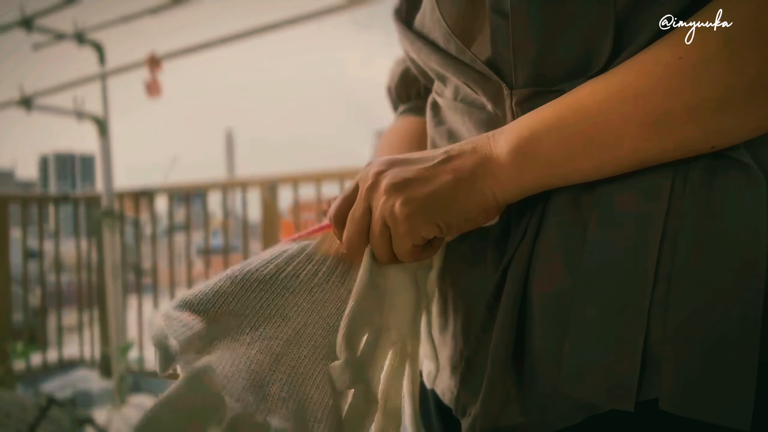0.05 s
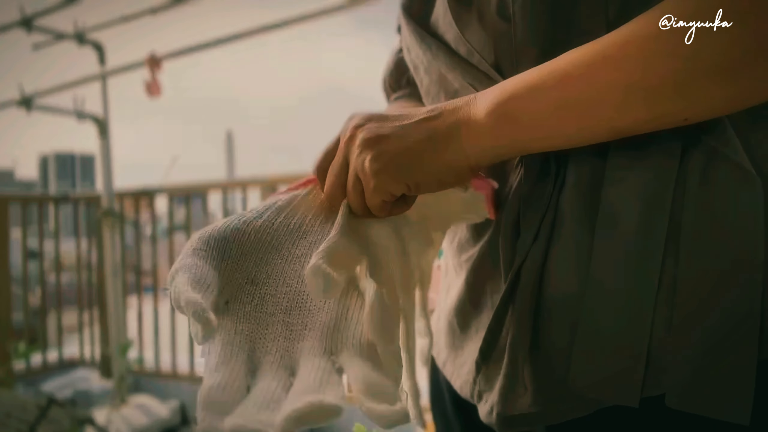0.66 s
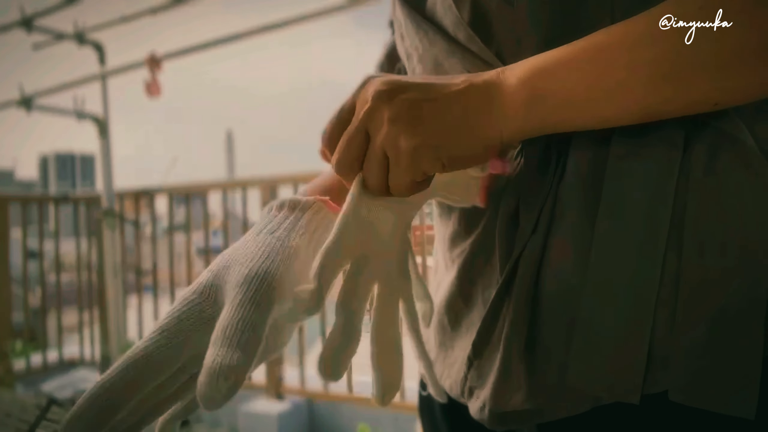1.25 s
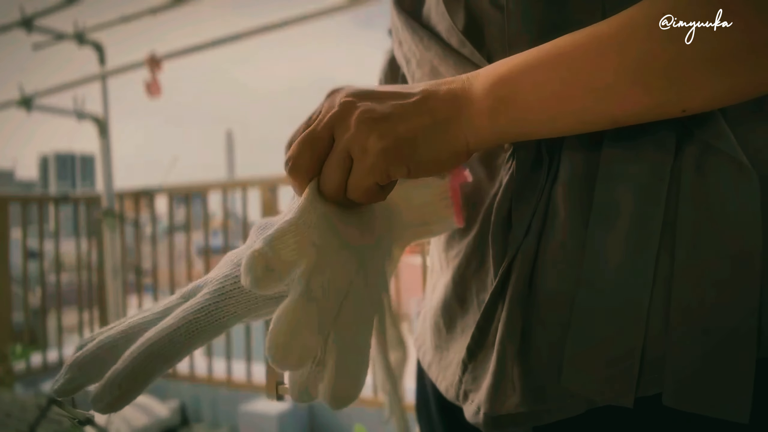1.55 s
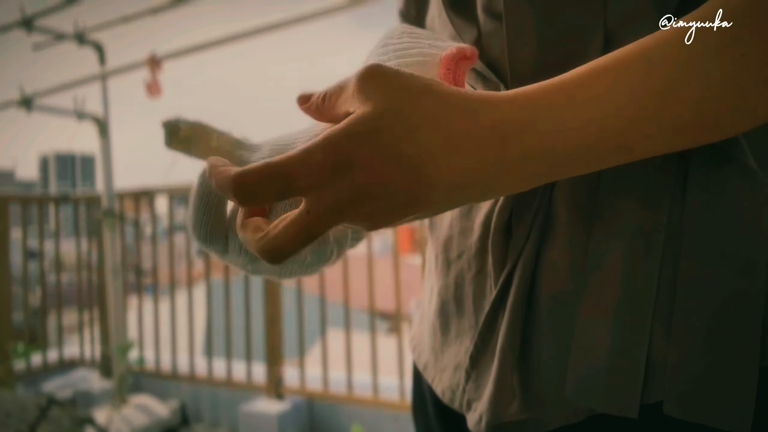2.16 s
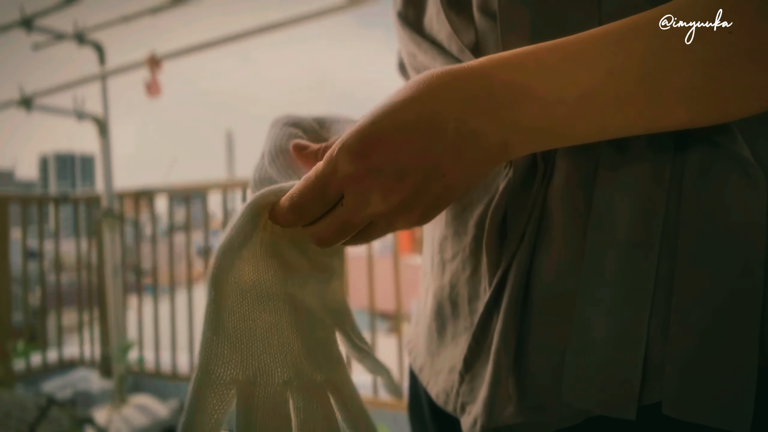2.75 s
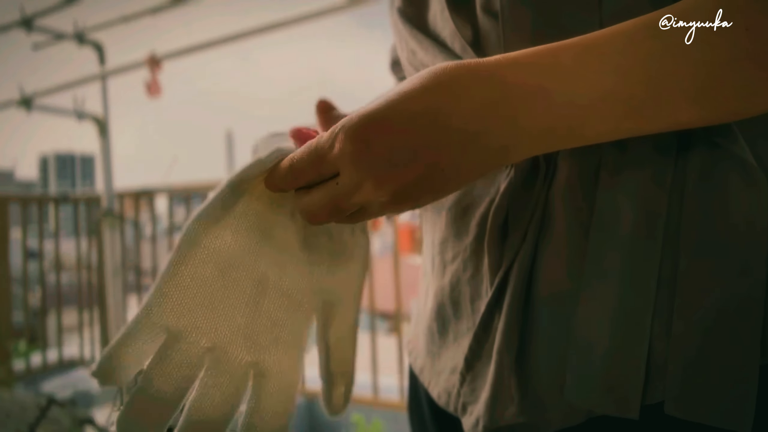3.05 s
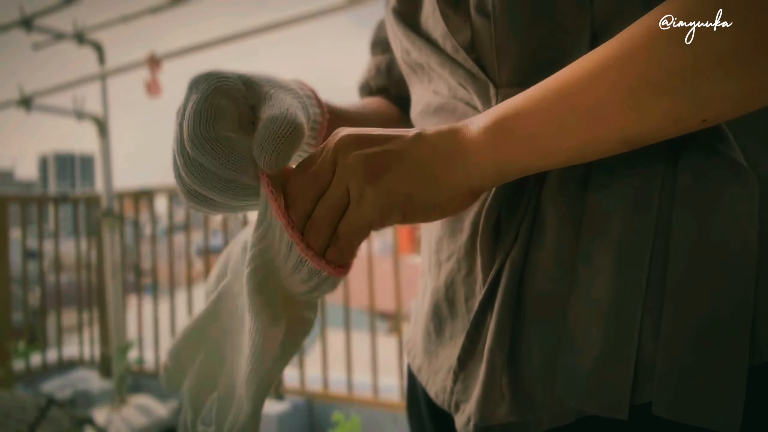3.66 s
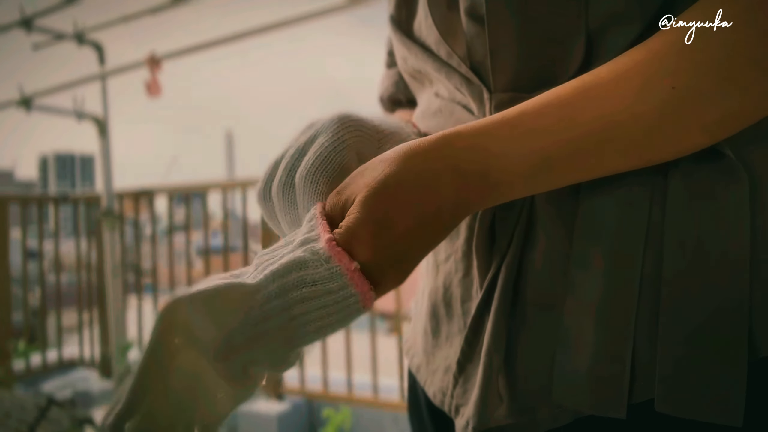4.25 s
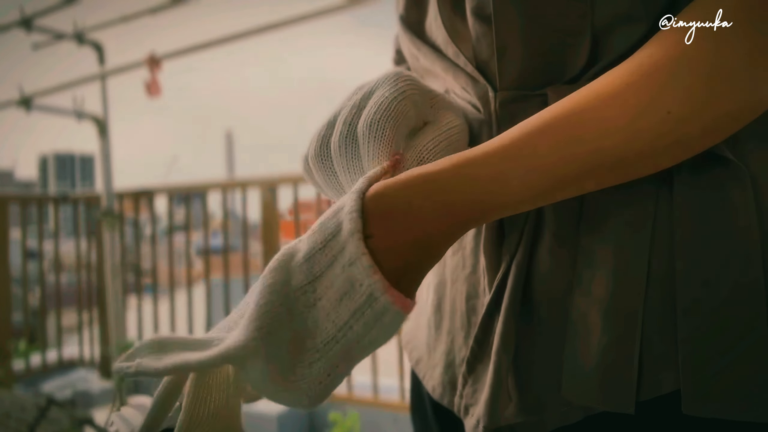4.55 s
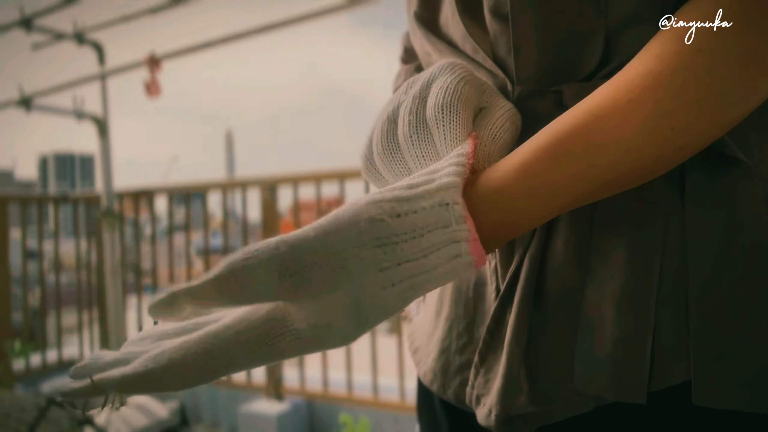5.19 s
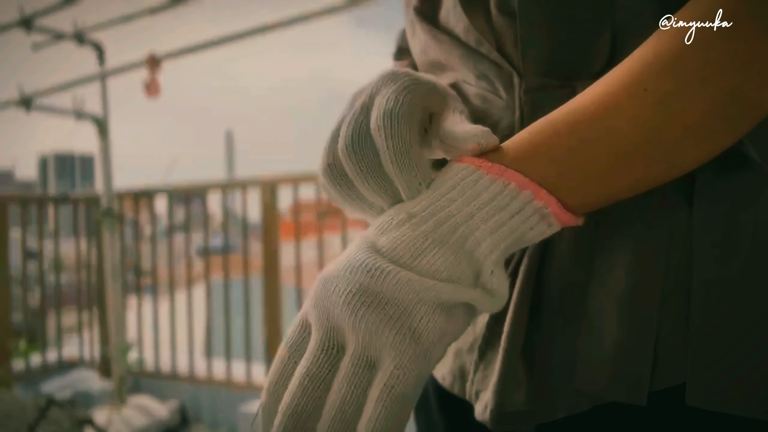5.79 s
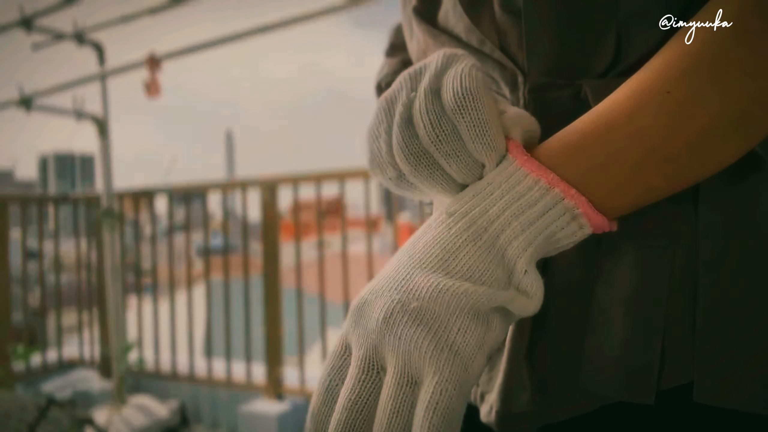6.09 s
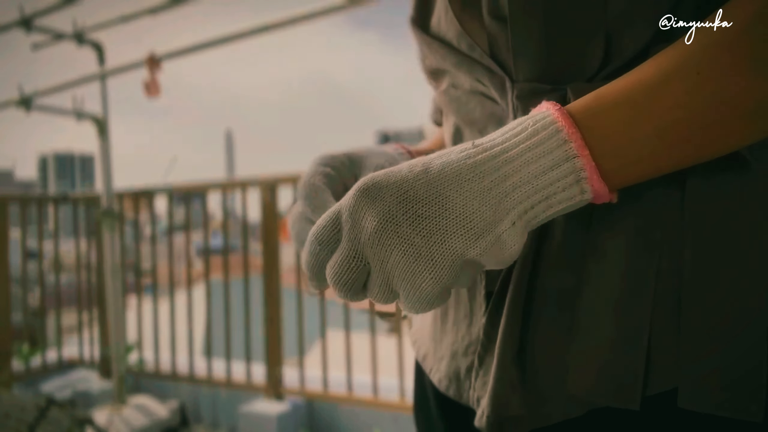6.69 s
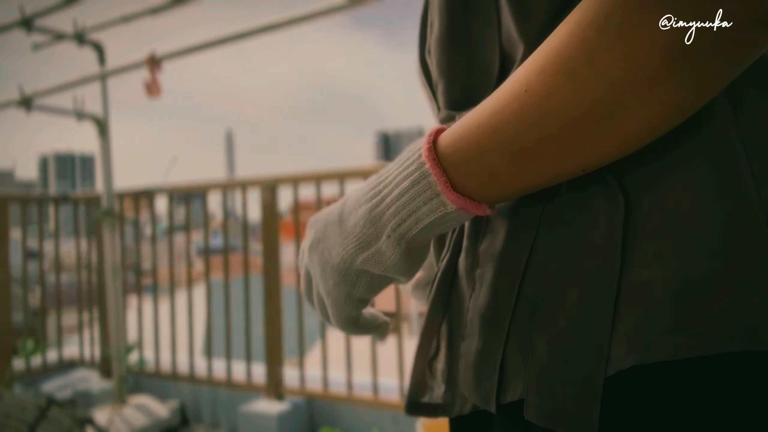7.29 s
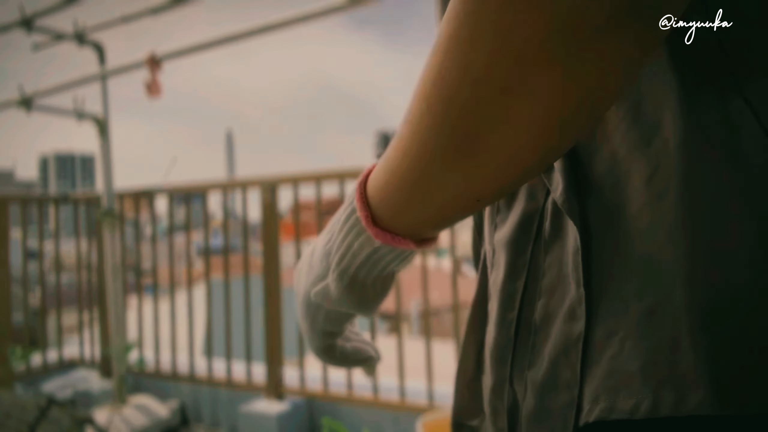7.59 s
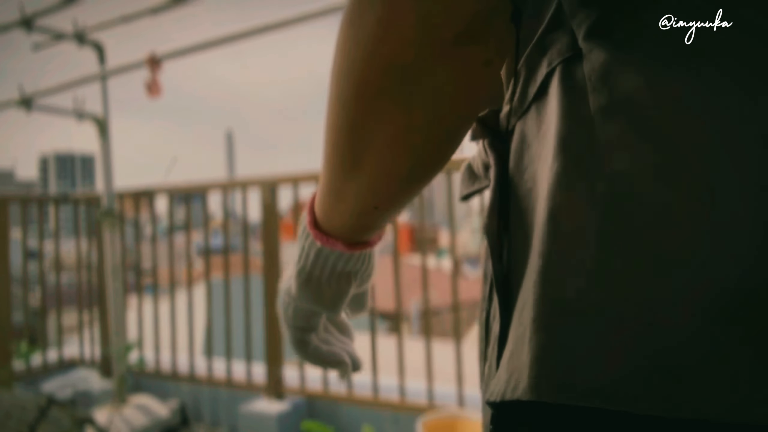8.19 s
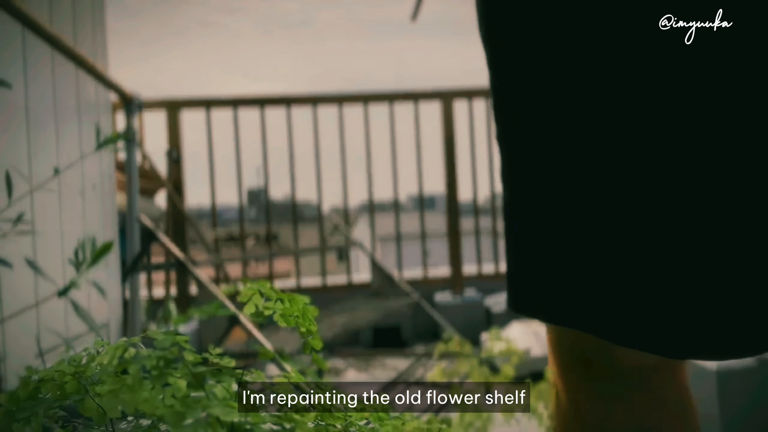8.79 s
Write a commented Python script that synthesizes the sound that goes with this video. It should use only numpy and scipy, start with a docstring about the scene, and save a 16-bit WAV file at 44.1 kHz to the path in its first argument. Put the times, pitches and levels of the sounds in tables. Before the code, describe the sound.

Small birds chirp and whistle in quick, short notes at several distances, over the constant low roar of far traffic and a wavering motor hum. Near the stereo microphone, someone on a roof balcony tugs on knitted gloves, the yarn faintly rubbing and giving a cluster of tiny snaps. From halfway, deep gusts of air hit the microphone, peaking with a dull thump. A couple of light knocks come near the end.

```python
"""A roof balcony in a city. Far traffic roars (dark noise) and a motor hums (a few low, wavering tones).
Close by, someone pulls on a knitted work glove: the yarn rustles and snaps (bright noise and clicks).
A sparrow repeats a buzzy chirp and other small birds whistle (gliding tones that echo off the houses).
From about halfway, puffs of air buffet the stereo microphone (swells of deep noise), and near the end
come a few soft bumps (low tones that die quickly)."""
import sys
import numpy as np
from scipy import signal
from scipy.fft import rfft, irfft
from scipy.io import wavfile
from scipy.ndimage import uniform_filter1d

SR = 44100
rng = np.random.default_rng(int(sys.argv[2]) if len(sys.argv) > 2 else 0)


def to_wav(s):
    """Save 16-bit WAV."""
    ch = np.atleast_2d(s).T  # columns
    pcm = np.round(np.clip(ch, -1, 1) * 32767)  # PCM
    wavfile.write(sys.argv[1], SR, pcm.astype(np.int16))


N = 389844
TIME = np.arange(N) / SR


def undb(db):
    """Turn decibels into a number to multiply by."""
    return 10 ** (np.asarray(db) / 20)


def unit(x):
    """Scale a signal to an average strength (rms) of one."""
    return x / np.sqrt(np.mean(x ** 2) + 1e-24)


def curves(table):
    """Join rows of (time_s, values...) into one curve over time for each value."""
    times, *columns = np.transpose(table)
    return [np.interp(TIME, times, column) for column in columns]


def across_spectrum(points):
    """Join (frequency_hz, value) points into a curve over all frequencies."""
    hz, value = np.transpose(points)
    return np.interp(np.log(np.fft.rfftfreq(N, 1 / SR) + 1), np.log(hz), value)


def colour(x, points):
    """Turn parts of a sound up or down by (frequency_hz, gain_db) points."""
    return irfft(rfft(x) * undb(across_spectrum(points)), N)


def wobble(per_s, size=N):
    """A smooth random curve, about one in size, with per_s new values a second."""
    hold = max(int(SR / per_s), 1)
    steps = np.repeat(rng.standard_normal(size // hold + 2), hold)
    return unit(uniform_filter1d(uniform_filter1d(steps, hold), hold))[:size]


def add(track, start_s, sound):
    """Mix a sound into a track."""
    i = max(int(start_s * SR), 0)
    track[i:i + len(sound)] += sound[:max(N - i, 0)]


def play(events):
    """Make a track from (start_s, sound) pairs."""
    track = np.zeros(N)
    for start_s, sound in events:
        add(track, start_s, sound)
    return track


def swells(table, power, crest=0.47):
    """A rise and fall for each (start_s, length_s, level_db); more power makes it more pointed."""
    def swell(length_s):
        progress = np.linspace(0, 1, int(length_s * SR))
        return np.abs(np.sin(np.interp(progress, [0, crest, 1], [0, np.pi / 2, np.pi]))) ** power
    return play((s, undb(db) * swell(length_s)) for s, length_s, db in table)


def note(arc_hz, length_s, db, waver=0.0097, flutter_db=2.0):
    """A bird's whistle: a nearly pure tone gliding through a start, middle and end pitch."""
    size = int(length_s * SR)
    arc = np.polyval(np.polyfit([0, .5, 1], arc_hz, 2), np.linspace(0, 1, size))
    hz = arc * (1 + waver * wobble(288, SR // 4)[:size])
    loudness = np.sqrt(2) * undb(db + flutter_db * wobble(124, SR // 4)[:size])
    return loudness * signal.windows.tukey(size, .35) * np.sin(2 * np.pi * np.cumsum(hz) / SR)


# the tone of the traffic: frequency_hz, gain_db
TRAFFIC_COLOUR = [(12, -0.5), (28, -16.5), (42, 3), (65, 3), (110, -4), (200, -8.5), (350, -16.5),
                  (750, -15.5), (1100, -21), (1600, -32), (3000, -43), (6000, -55), (13000, -59.5),
                  (16000, -65)]
# its slow swell: time_s, level_db (before gain_db)
TRAFFIC_SWELL = [(0, -54.5), (1.6, -54), (2.6, -54.5), (4, -54), (6, -54.5), (7.5, -53.5), (8.3, -54.5),
                 (8.84, -55)]
# its extra rumble: time_s, bass_gain_db
TRAFFIC_BASS = [(0, 0.5), (2, 0), (4, .7), (6.5, 1.5), (7.3, -0.5), (7.6, -0.5), (8.84, 0.5)]
# how alike left and right are: frequency_hz, likeness (0 to 1)
TRAFFIC_LIKENESS = [(40, 0.65), (150, 0.99), (500, 0.43), (1000, 0.41), (2500, 0.45), (12000, 0.67)]
# which side is louder: frequency_hz, left_minus_right_db
TRAFFIC_BALANCE = [(60, 0), (200, -2), (700, -3), (1300, -1), (8000, -0.5)]


def traffic(gain_db=9, flicker_db=0.5, bass_hz=150):
    """Far traffic blends into a wide, dark roar that swells slowly."""
    db, = curves(TRAFFIC_SWELL)
    bass_db, = curves(TRAFFIC_BASS)
    alike = across_spectrum(TRAFFIC_LIKENESS)
    lean = undb(across_spectrum(TRAFFIC_BALANCE) / 2)
    # mid is what both ears share, side is what sets them apart
    mid, side = rfft(rng.standard_normal((2, N)))
    mid, side = mid * np.sqrt(1 + alike), side * np.sqrt(1 - alike)
    noise = irfft([(mid + side) * lean, (mid - side) / lean], N)
    roar = unit(colour(noise, TRAFFIC_COLOUR))
    bass = colour(roar, [(bass_hz, 0), (2 * bass_hz, -20)])
    return (roar + (undb(bass_db) - 1) * bass) * undb(db + gain_db + flicker_db * wobble(9))


# how the hum drifts: time_s, pitch_hz, level_db (before gain_db)
HUM_DRIFT = [(0, 52.2, -59), (.55, 49.56, -54), (.8, 47.08, -53), (2, 46.22, -44), (3.3, 46.77, -43.5),
             (4.5, 46.5, -48), (7.1, 46.53, -41.5), (7.5, 46.9, -60), (8.84, 47.2, -69)]
# the tones in the hum: pitch_multiple, gain_db
HUM_TONES = [(1, -3), (2, -10), (3, -22.5), (5, -22)]


def motor(gain_db=-1.5, pan_db=-3.0, lag_radians=0.4):
    """A motor below hums on a few wavering tones; walls put left and right a little out of step."""
    hz, db = curves(HUM_DRIFT)
    phase = 2 * np.pi * np.cumsum(hz * (1 + .02 * wobble(6))) / SR
    sides = np.array([[.5], [-.5]])
    hum = np.zeros((2, N))
    for multiple, tone_db in HUM_TONES:
        strength = undb(tone_db + 3.0 * wobble(6))
        hum += strength * np.sin(multiple * phase + lag_radians * sides * wobble(3.18))
    return np.sqrt(2) * hum * undb(db + gain_db + pan_db * sides)


# the distant flock: time_s, level_db (before gain_db)
TWITTER_SWELL = [(0, -74.5), (1.5, -73), (2.3, -75), (2.7, -81.5), (3.2, -76.5), (3.9, -74), (5.2, -78),
                 (6.7, -81.5), (8.2, -72), (8.4, -82), (8.84, -71)]


def twitter(count=300, scatter_db=1.0, gain_db=-7):
    """Many faint birds whistle short glides at random moments and pitches, most of them falling."""
    db, = curves(TWITTER_SWELL)
    flock = np.zeros(N)
    for k, (when, length, pitch, bend, glide, strength) in enumerate(rng.random((count, 6))):
        hz, sweep_hz = 2100 + 2600 * pitch, 1700 * (glide - .7)
        arc_hz = [hz - sweep_hz, hz + 400 * bend, hz + sweep_hz]
        note_db = scatter_db * (2 * strength - 1)
        whistle = note(arc_hz, .02 + .04 * length, note_db, waver=0.021, flutter_db=1)
        add(flock, (k + when) / count * N / SR, whistle)
    return flock * undb(db + gain_db)


def stitch_catches(per_s=45, gain_db=2.5, decay_s=0.0038):
    """Stitches catch and let go at random, making brief jumps in the strength of the rubbing."""
    jolts = (rng.random(N) < per_s / SR) * rng.random(N)
    return undb(gain_db) * signal.lfilter([1], [1, -np.exp(-1 / (decay_s * SR))], jolts)


# pulls of the glove over the hand: start_s, length_s, level_db (before rub_db)
GLOVE_PULLS = [(.02, .14, -78), (.17, .24, -78.5), (.39, 0.085, -73.5), (.64, 0.14, -72.5),
               (.8, 0.1, -70.5), (.93, .12, -68), (1.19, 0.092, -77), (1.58, 0.15, -71.5),
               (1.82, 0.05, -79), (3.18, 0.13, -75.5), (3.58, 0.075, -75), (3.67, .14, -72.5),
               (3.8, 0.084, -71.5), (4.21, 0.22, -66), (4.38, .35, -67.5), (4.77, 0.37, -74),
               (5.1, 0.35, -69), (5.55, .07, -74), (5.77, .07, -76), (6.11, 0.14, -73), (6.6, .5, -80),
               (7.2, 0.21, -81.5), (7.52, 0.33, -78.5), (8.6, 0.57, -75)]
# the tone of rubbing yarn: frequency_hz, gain_db
YARN_COLOUR = [(700, -26), (2000, 8.5), (4000, 0), (6500, 3.5), (9000, 1.5), (12500, 2), (14500, 0),
               (16000, -13)]
# snapping threads: start_s, peak_db, centre_hz, width_hz, decay_s
YARN_SNAPS = [(3.245, -49, 10000, 6000, .001), (3.834, -37, 9500, 6940, .0012),
              (4.269, -36.5, 2180, 1800, 0.003), (4.2793, -34, 11400, 6000, 0.0011),
              (4.294, -45, 11000, 7000, .0006), (4.345, -31.5, 10800, 3500, 0.00086),
              (4.437, -41, 9500, 8000, .002), (4.5142, -33, 10800, 2800, .0005),
              (6.18, -49, 9000, 7950, .0011)]
# the phase shift of the right side against the left: frequency_hz, shift_radians
RIGHT_PHASE_SHIFT = [(100, 0), (5000, -.3), (6800, -2.7), (7500, -2.5), (9100, -.9), (12200, .5),
                     (13400, 1.6), (14600, 2.9)]


def glove(rub_db=2, grain_db=3.0, spread=0.72):
    """Countless fibres slip over the skin and a few threads snap."""
    pull = swells(GLOVE_PULLS, power=0.72)
    slips = rng.standard_normal((3, N)) * undb(grain_db * rng.exponential(size=(3, N)))
    rustle = unit(colour(slips, YARN_COLOUR)) * pull * (1 + stitch_catches())
    direct, *scattered = rustle * undb(rub_db + 0.76 * wobble(150))
    t = np.arange(SR // 50) / SR
    for start_s, peak_db, hz, width_hz, decay_s in YARN_SNAPS:
        snap = band(rng.standard_normal(len(t)) * np.exp(-t / decay_s), hz, width_hz)
        add(direct, start_s, undb(peak_db) * snap / np.abs(snap).max())
    # the treble's phase shifts between left and right, widening the rustle
    right = irfft(rfft(direct) * np.exp(-1j * across_spectrum(RIGHT_PHASE_SHIFT)), N)
    return np.array([direct, right]) + spread * np.array(scattered)


def band(x, hz, width_hz):
    """Keep the part of a sound near one frequency."""
    return signal.lfilter(*signal.iirpeak(hz, hz / width_hz, fs=SR), x)


# opening peeps, each a flick over a falling note: start_s, level_db
FAR_PEEPS = [(.149, -64), (.331, -63), (.518, -64.5)]
# slow whistles that go up and down: start_s, level_db
FAR_ARCHES = [(1.404, -71), (1.9, -72), (2.42, -69), (2.98, -71), (3.13, -71), (3.51, -68.5)]
# falling notes between them: start_s, level_db
FAR_FALLS = [(1.04, -68), (1.67, -66), (1.8, -69), (2.164, -68), (2.616, -67), (3.096, -68.5), (3.5, -73),
             (3.956, -68.5), (4.03, -68), (4.414, -72), (4.5, -64.5)]
# a short high note, then a lower one: start_s, low_length_s, low_pitch_hz, level_db (before the mix)
FAR_TWO_STEPS = [(4.82, 0.048, 2105, -69), (5.16, 0.042, 2096, -70), (5.2, .08, 2295, -69.5),
                 (5.485, 0.057, 2110, -69), (5.72, .11, 2300, -69), (5.84, 0.042, 2100, -69),
                 (6.255, 0.045, 2115, -66.5), (6.61, 0.065, 2130, -68.5), (6.811, 0.079, 2302, -70.5),
                 (7.005, 0.092, 2153, -72.5)]
# the lower note's bend, in multiples of its pitch: start, middle, end
LOW_BEND = [1.04, 1, 1.005]


def far_bird(peep_hz=(2170, 2540, 2130), arch_hz=(1960, 2300, 1690), fall_hz=(2261, 2027, 1950),
             high_hz=(2763, 2590, 2380), peep_s=0.019, arch_s=.125, fall_s=0.0547, high_s=.036):
    """A lower voice whistles further off. Gives the direct sound and the sound that will echo."""
    peeps = play((s, note(peep_hz, peep_s, db)) for s, db in FAR_PEEPS)
    peeps += play((s + 0.0091, note(fall_hz, fall_s, db - 4)) for s, db in FAR_PEEPS)
    arches = play((s, note(arch_hz, arch_s, db, waver=0.0089, flutter_db=2.5)) for s, db in FAR_ARCHES)
    falls = play((s, note(fall_hz, fall_s, db, waver=0.019)) for s, db in FAR_FALLS)
    steps = play((s, note(high_hz, high_s, db - 2.5, waver=0.019)) for s, _, _, db in FAR_TWO_STEPS)
    steps += play((s + high_s, note(hz * np.array(LOW_BEND), length_s, db, waver=.016))
                  for s, length_s, hz, db in FAR_TWO_STEPS)
    # the arches carry straight across; the two-step calls arrive mostly as echo
    direct = peeps + arches + falls + undb(-0.5) * steps
    outgoing = peeps + falls + undb(-4) * arches + undb(5) * steps
    return direct, outgoing


# rising whistles: start_s, length_s, level_db
SONG_RISES = [(0.724, 0.12, -70), (0.956, 0.13, -68.5), (1.28, 0.096, -66.5), (1.507, .1, -65.5),
              (7.021, .11, -68), (7.273, .085, -67.5)]
# the glide they share: start_hz, middle_hz, end_hz
RISE_ARC_HZ = [2640, 3090, 3214]
# quick downward slides: start_s, length_s, pitch_hz, level_db
SONG_SLIDES = [(.215, 0.079, 4690, -71), (0.589, 0.026, 4670, -71.5), (.89, 0.05, 3900, -73),
               (1.684, 0.032, 4200, -67.5), (1.758, 0.034, 3580, -67), (1.917, 0.021, 3830, -68),
               (1.946, .02, 4050, -72), (2.068, 0.024, 4800, -68.5), (2.328, 0.06, 3850, -68.5),
               (5.921, 0.081, 4930, -73), (6.027, 0.033, 4800, -69.5), (6.356, 0.036, 5100, -75),
               (6.488, .03, 5170, -72), (6.56, .035, 4580, -68.5), (7.111, 0.039, 4360, -63.5),
               (7.167, .07, 5420, -74), (7.421, 0.039, 4440, -71), (7.658, 0.035, 4020, -67.5),
               (7.803, 0.033, 4860, -71.5), (7.958, .056, 3500, -72), (8.09, 0.041, 3480, -73)]
# a slide's bend, in multiples of its pitch: start, middle, end
SLIDE_BEND = [1, .89, .73]
# short upturned notes: start_s, pitch_hz, level_db
SONG_LILTS = [(.415, 5580, -76), (.58, 2930, -71), (1.39, 3560, -66), (1.78, 2600, -66), (1.966, 3480, -67),
              (2.112, 3710, -65.5), (5.77, 5060, -76), (6.815, 3140, -68.5), (7.04, 5080, -75.5),
              (7.085, 3576, -62.5), (7.46, 3420, -68.5), (7.708, 3530, -71), (7.845, 3690, -70),
              (7.947, 5070, -77), (8.175, 4270, -73)]


def songbird(lilt_bend=(0.92, 1, 1.025), lilt_s=0.0377):
    """A bird warbles three kinds of note: rising whistles, downward slides and short upturned lilts."""
    rises = play((s, note(RISE_ARC_HZ, length_s, db)) for s, length_s, db in SONG_RISES)
    slides = play((s, note(hz * np.array(SLIDE_BEND), length_s, db, waver=0.02, flutter_db=1.0))
                  for s, length_s, hz, db in SONG_SLIDES)
    lilts = play((s, note(hz * np.array(lilt_bend), lilt_s, db, waver=0.014))
                 for s, hz, db in SONG_LILTS)
    return rises + slides + lilts


# buzzy chirps: start_s, length_s, end_pitch_hz, drop_hz, warble_hz, level_db (before swell and rasp)
SPARROW_CHIRPS = [(0.736, 0.17, 3870, 322, 636, -58.5), (1.476, 0.16, 4066, 171.4, 540, -56.5),
                  (2.186, 0.14, 3980, 425, 590, -59.5), (2.85, .21, 3924, 311, 764, -58.5),
                  (3.595, .19, 3970, 385, 564, -60.5), (4.265, 0.14, 4130, 211.5, 557, -56.5),
                  (4.931, .19, 4070, 380, 598, -60), (5.479, .21, 4763, 220, 497, -63.5),
                  (5.99, .21, 4750, 60, 440, -63.5), (6.522, 0.23, 4950, 122, 475, -64)]
# faint up-and-down chips that lead into some chirps: start_s, level_db
SPARROW_CHIPS = [(1.385, -80), (2.105, -70), (2.763, -70.5), (3.497, -75), (4.168, -66), (4.84, -73)]


def sparrow(first_buzz_hz=85, buzz_hz=135, overtone_db=-30, chip_hz=(4000, 5130, 4320), chip_s=.053):
    """Each chirp sinks in pitch while quick upward flicks speed up and shrink to a trembling whistle."""
    chirps = np.zeros(N)
    for start_s, length_s, end_hz, drop_hz, warble_hz, db in SPARROW_CHIRPS:
        size = int(length_s * SR)
        progress = np.linspace(0, 1, size)
        flick_hz = np.interp(progress, [0, .35], [first_buzz_hz, buzz_hz]) * (1 + .15 * wobble(60, size))
        depth = np.interp(progress, [0, .2, .5, 1], [1, .85, .25, .08])
        flick = depth * np.sin(np.pi * np.cumsum(flick_hz) / SR) ** 4
        sinking_hz = end_hz + drop_hz * (1 - progress) ** 1.1
        hz = sinking_hz + warble_hz * (flick - .05) + 30 * wobble(300, size)
        phase = 2 * np.pi * np.cumsum(hz) / SR
        swell_db = np.interp(progress, [0, 0.18, 1], [-8, 2, -8])
        # the voice thins at the top of each flick and trembles
        rasp_db = -9 * flick + 2.5 * wobble(110, size)
        loudness = undb(db + swell_db + rasp_db) * signal.windows.tukey(size, .12)
        add(chirps, start_s, loudness * (np.sin(phase) + undb(overtone_db) * np.sin(2 * phase)))
    return np.sqrt(2) * chirps + play((s, note(chip_hz, chip_s, db)) for s, db in SPARROW_CHIPS)


# clear pips: start_s, pitch_hz, level_db
NEAR_PIPS = [(1.12, 2670, -58), (2.52, 2640, -57.5), (3.195, 2686, -57.5), (3.933, 2570, -63),
             (4.583, 2630, -61.5)]


def near_bird(bend=(1.025, 0.99, 1), pip_s=0.042):
    """A nearer bird whistles short pips that hardly change pitch."""
    return play((s, note(hz * np.array(bend), pip_s, db, waver=0.014)) for s, hz, db in NEAR_PIPS)


# puffs of air: start_s, length_s, level_db, left_minus_right_db
AIR_PUFFS = [(4.261, .07, -38.5, 0), (4.361, .07, -38, -1), (4.471, .06, -41, -7), (4.712, .06, -36.5, -3),
             (4.997, 0.052, -34.5, -2), (5.194, 0.061, -37.5, -3), (5.467, 0.059, -39.5, -4),
             (5.73, .08, -41, 1), (5.895, 0.061, -42.5, 0), (5.987, 0.1, -36, -1), (6.23, .07, -49, -2),
             (6.387, .1, -40, 2), (6.522, .19, -36, 3.5), (6.849, .11, -27, 2), (6.953, 0.23, -30.5, -2)]
# their deep tone: frequency_hz, gain_db
PUFF_COLOUR = [(12, -14), (30, 3), (50, 9.5), (85, 5), (130, -6.5), (200, -20.5), (320, -34.5),
               (700, -72.5)]


def wind(spread=0.56):
    """With each puff, swirling air presses on the microphone's left and right openings."""
    left = [(s, length_s, db + pan_db / 2) for s, length_s, db, pan_db in AIR_PUFFS]
    right = [(s, length_s, db - pan_db / 2) for s, length_s, db, pan_db in AIR_PUFFS]
    push = np.array([swells(left, power=0.45), swells(right, power=0.45)])
    mid, side = unit(colour(rng.standard_normal((2, N)), PUFF_COLOUR))
    # even out the noise so that equally strong puffs sound about equally loud
    mid = mid / np.sqrt(uniform_filter1d(mid ** 2, SR // 12))
    return push * np.array([mid + spread * side, mid - spread * side])


# soft bumps and steps: start_s, level_db, pitch_hz, decay_s, scuff_gain_db, scuff_hz
SOFT_BUMPS = [(6.65, -32.5, 113.5, 0.033, -7, 130), (6.862, -18.5, 72, 0.034, -14, 125),
              (7.05, -32, 111.3, 0.056, -9.5, 158), (7.699, -46.5, 303.5, 0.031, 1.5, 740),
              (7.712, -30.5, 109, 0.02, -14.5, 590), (8.661, -31.5, 315, 0.0083, -7.5, 364),
              (8.693, -36.5, 243, 0.02, -17, 380)]


def bumps(scuff_decay_s=0.019, attack_s=0.0023):
    """Each bump is a dull thud that dies quickly, with a short scuff of noise on top."""
    left, right = np.zeros((2, N))
    t = np.arange(SR // 3) / SR
    for start_s, db, hz, decay_s, scuff_db, scuff_hz in SOFT_BUMPS:
        thud = np.sin(2 * np.pi * hz * t) * np.exp(-t / decay_s)
        width_hz = 0.7 * scuff_hz
        scuff = band(band(rng.standard_normal((2, len(t))), scuff_hz, width_hz), scuff_hz, width_hz)
        mid, side = undb(scuff_db) * unit(scuff) * np.exp(-t / scuff_decay_s)
        push = undb(db) * (1 - np.exp(-t / attack_s))
        add(left, start_s, push * (thud + mid + side))
        add(right, start_s, push * (thud + mid - side))
    return np.array([left, right])


# two sharp bird calls: start_s, level_db
CALLS = [(8.207, -71), (8.604, -65)]
# the parts of each call: delay_s, length_s, start_hz, middle_hz, end_hz, gain_db
CALL_PARTS = [(-.003, .047, 4830, 6580, 6800, -4.5), (0.019, .032, 4780, 4770, 4670, 0),
              (0.055, 0.0135, 4500, 3290, 2600, 4)]


def sharp_calls():
    """A bird calls with a flick up, a held tone and a snap down, all a little hoarse."""
    return play((s + delay_s, note(arc_hz, length_s, db + part_db, waver=0.0092, flutter_db=4.0))
                for s, db in CALLS for delay_s, length_s, *arc_hz, part_db in CALL_PARTS)


def houses(direct, outgoing, echo_db, fade_s, spread, bounce_s=0.11):
    """Add echoes off the houses, with a second burst from those opposite; spread makes them wider."""
    t = np.arange(SR) / SR
    since_bounce = np.maximum(t - bounce_s, 0)
    bounce = (since_bounce > 0) * np.exp(-since_bounce / 0.007)
    shape = undb(-60 * t / fade_s) * (1 - np.exp(-t / 0.0019)) * (1 + bounce)
    mid, side = rng.standard_normal((2, SR)) * shape
    tails = [undb(echo_db) * unit(mid + sign * spread * side) / np.sqrt(SR) for sign in (1, -1)]
    # moving air makes the long paths flutter
    outgoing = outgoing * undb(2 * wobble(150))
    return direct + np.array([signal.fftconvolve(outgoing, tail)[:N] for tail in tails])


def scene():
    """Birds at several distances, the glove close up, the city all round."""
    around = traffic() + motor() + wind() + glove() + bumps()
    song, pips, calls, flock, chirps = songbird(), near_bird(), sharp_calls(), twitter(), sparrow()
    birds = houses(chirps, chirps, echo_db=-3.0, fade_s=0.85, spread=0.032)
    birds += houses(song, song, echo_db=0.5, fade_s=0.76, spread=0.042)
    birds += houses(pips, pips, echo_db=-8.0, fade_s=1.0, spread=0.08)
    birds += houses(calls, calls, echo_db=-1, fade_s=0.39, spread=0.08)
    birds += houses(*far_bird(), echo_db=1.0, fade_s=0.89, spread=0.089)
    birds += houses(flock, flock, echo_db=5.5, fade_s=0.53, spread=0.062)
    return birds + around


def record(dry, top_hz=15750):
    """Cut away the very highest treble."""
    return signal.sosfilt(signal.ellip(10, .2, 70, top_hz, fs=SR, output="sos"), dry)


dry = scene()
out = record(dry)
to_wav(out)
```